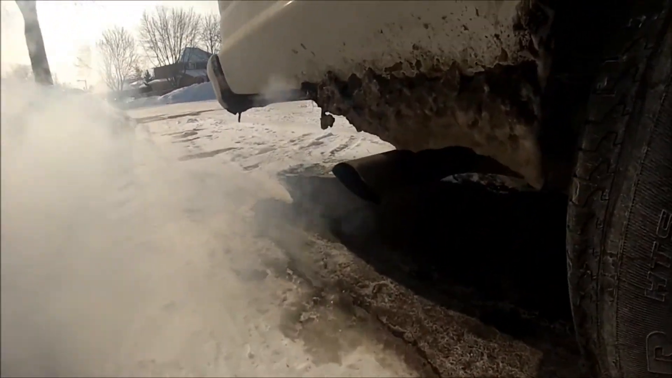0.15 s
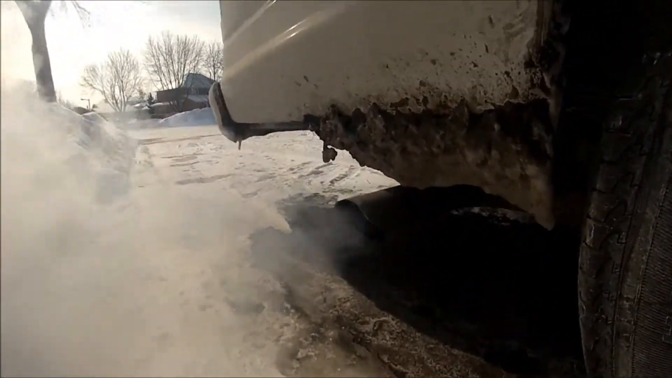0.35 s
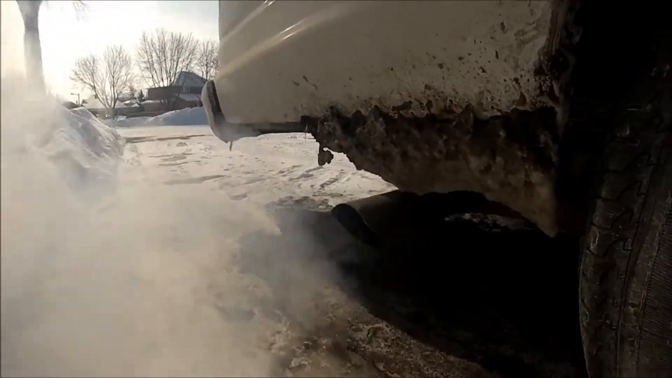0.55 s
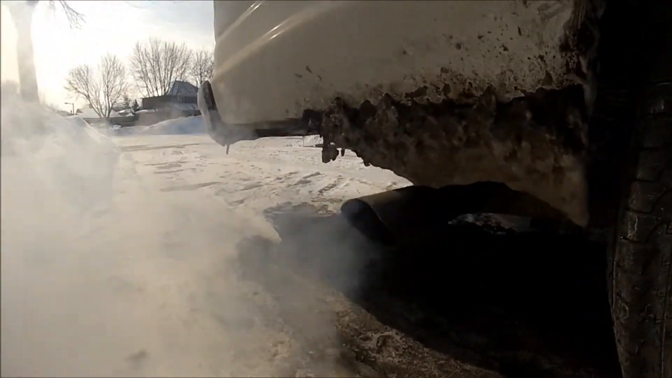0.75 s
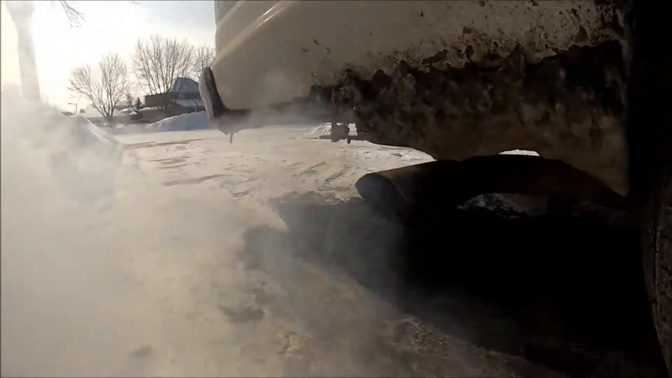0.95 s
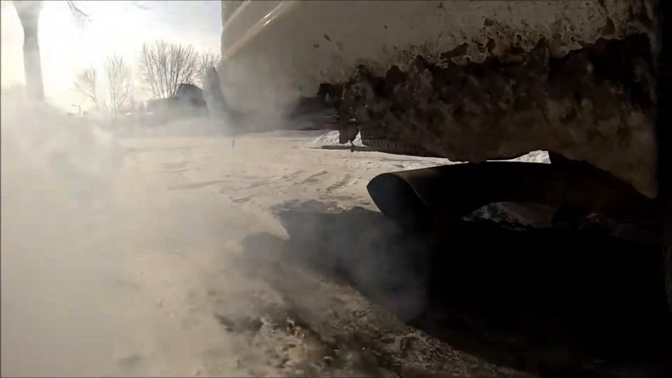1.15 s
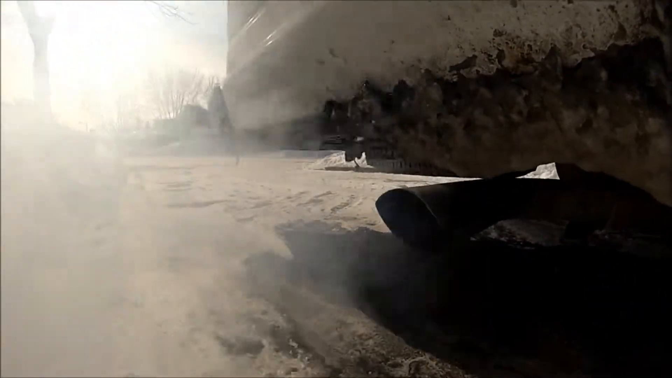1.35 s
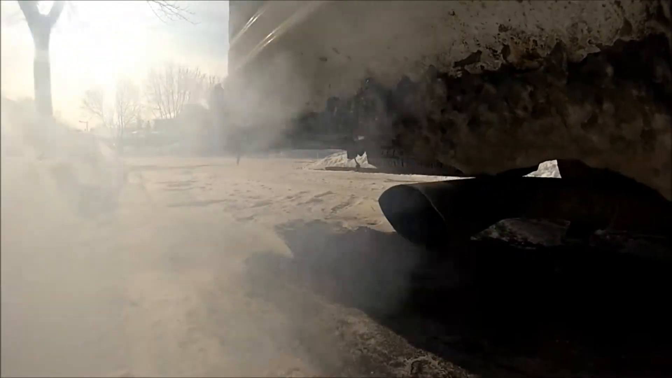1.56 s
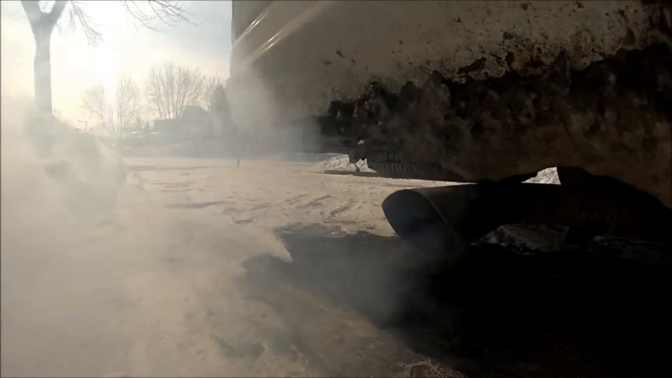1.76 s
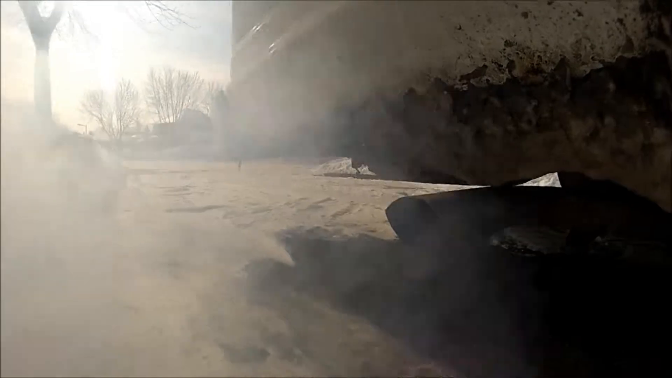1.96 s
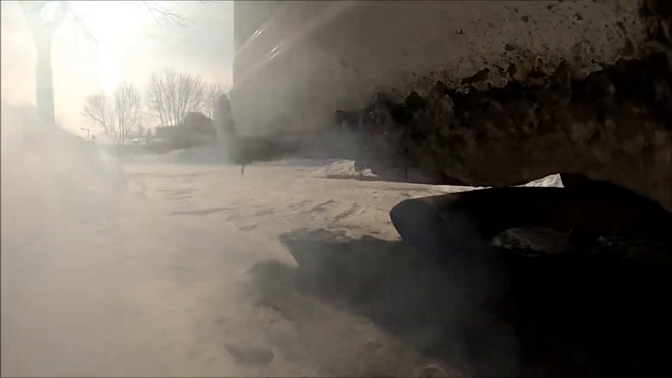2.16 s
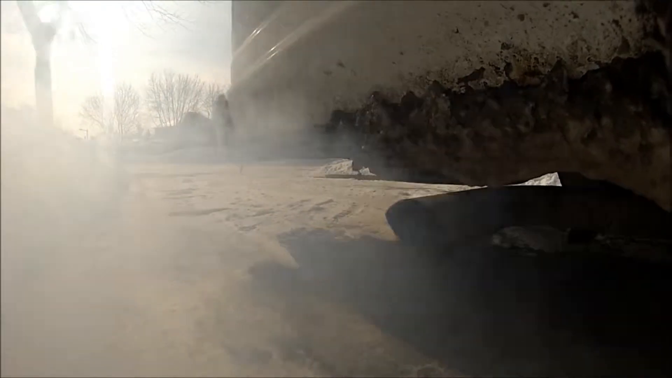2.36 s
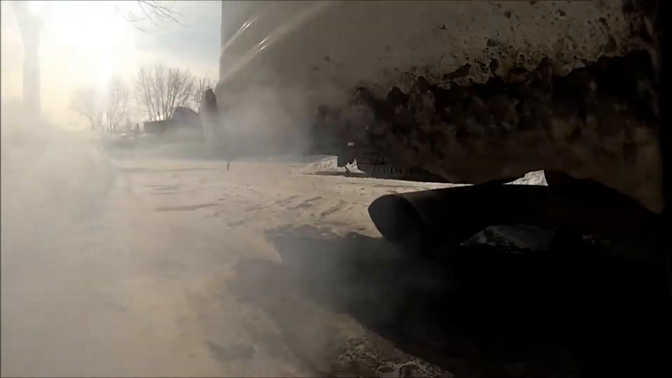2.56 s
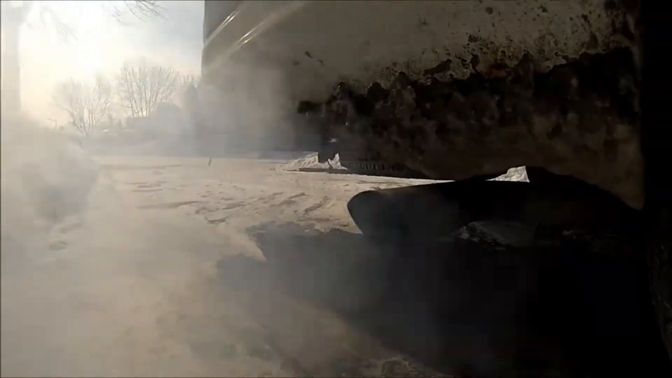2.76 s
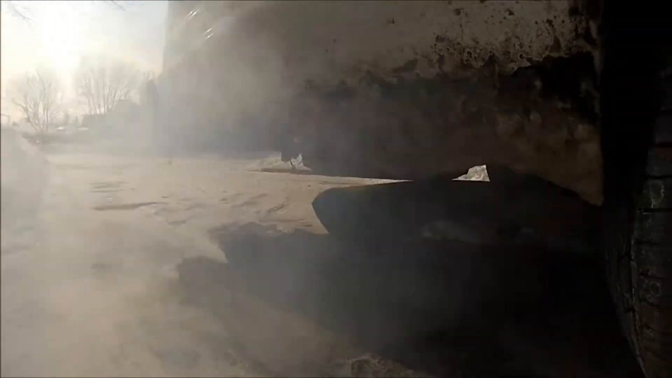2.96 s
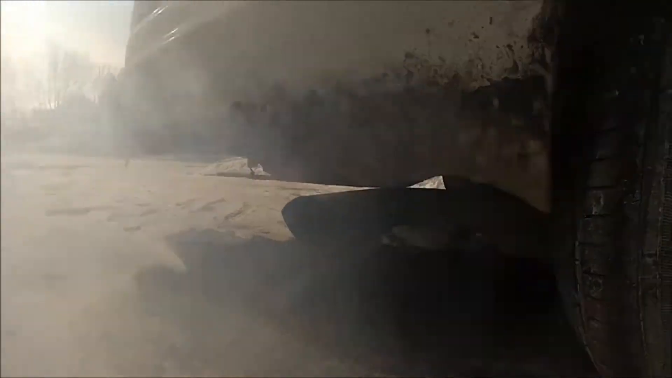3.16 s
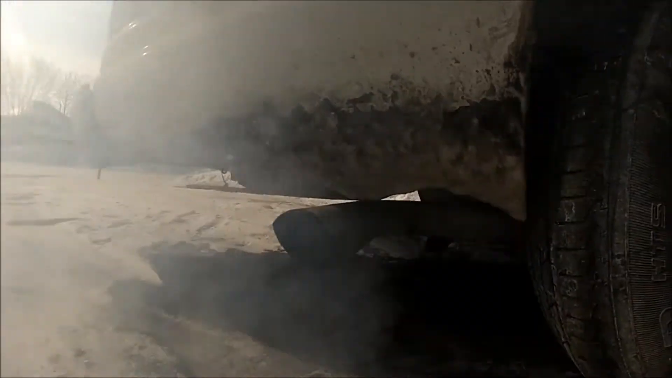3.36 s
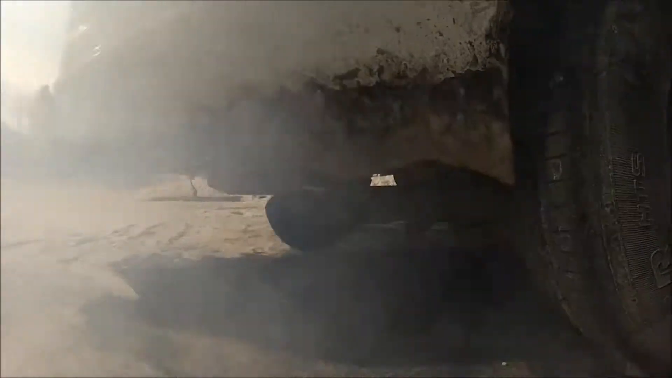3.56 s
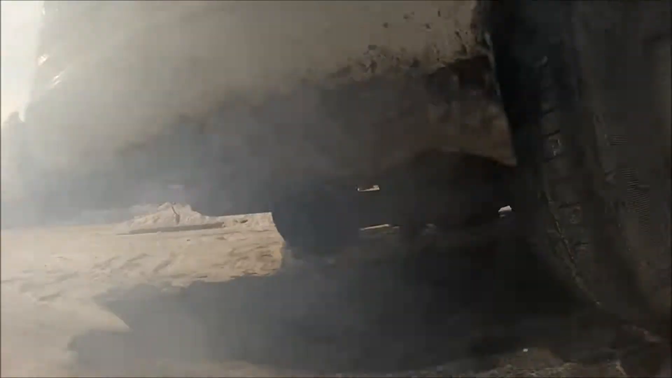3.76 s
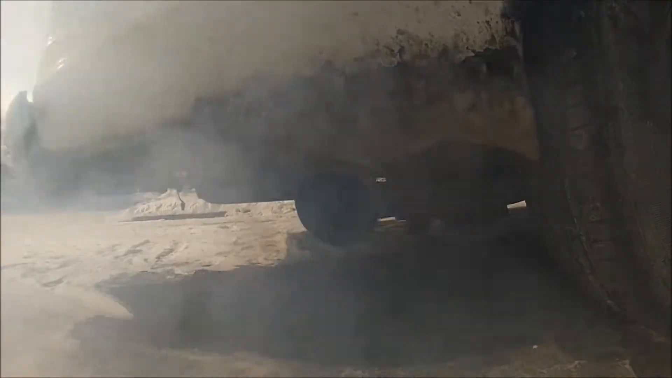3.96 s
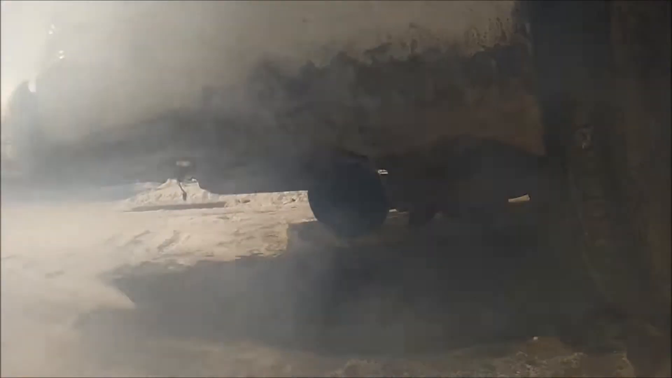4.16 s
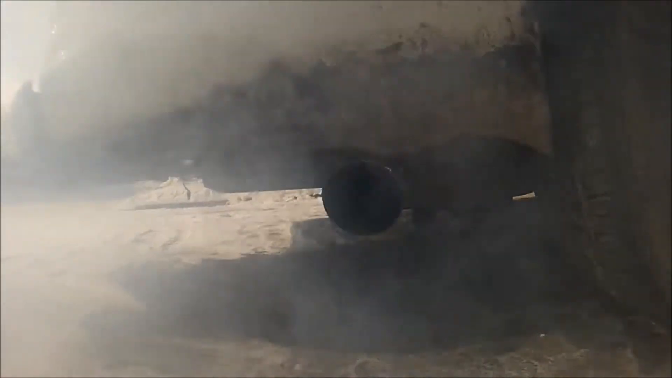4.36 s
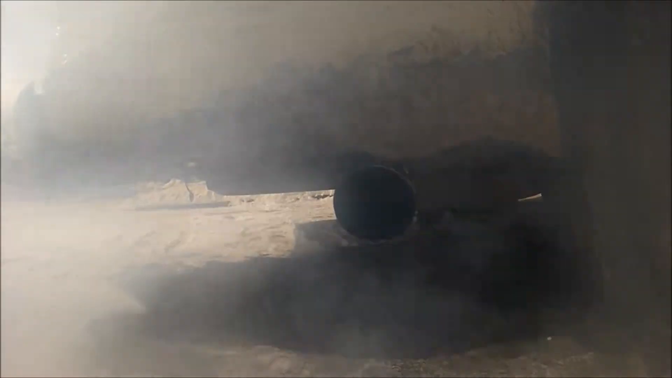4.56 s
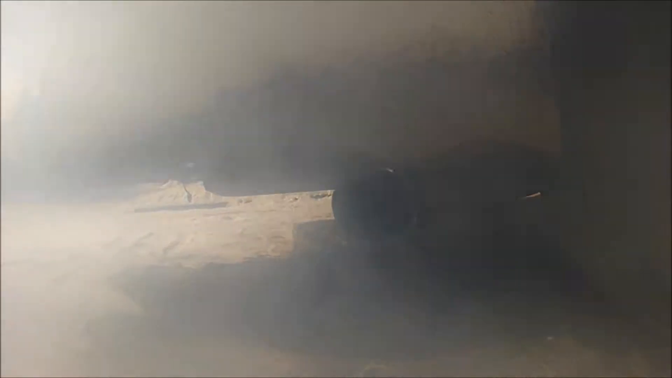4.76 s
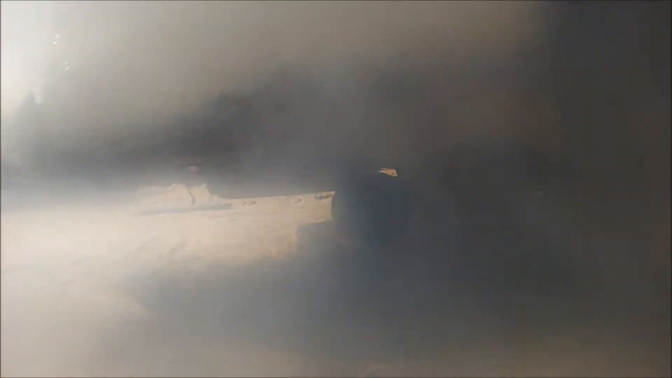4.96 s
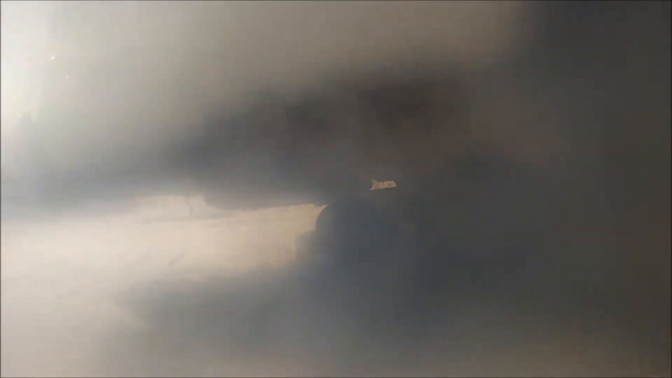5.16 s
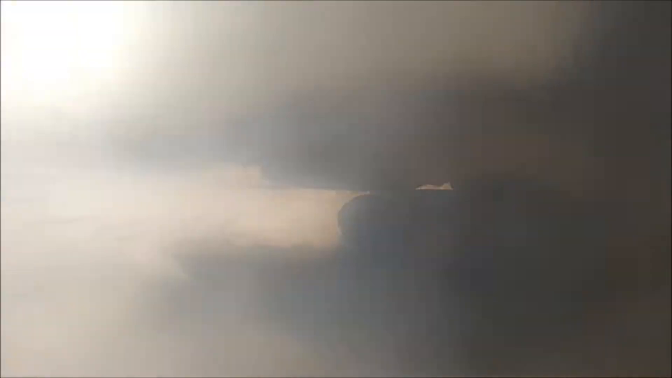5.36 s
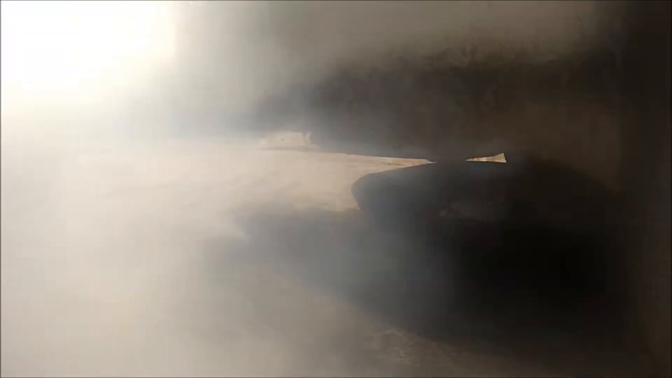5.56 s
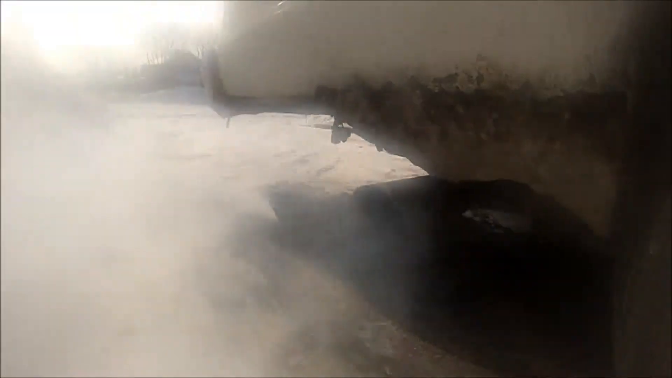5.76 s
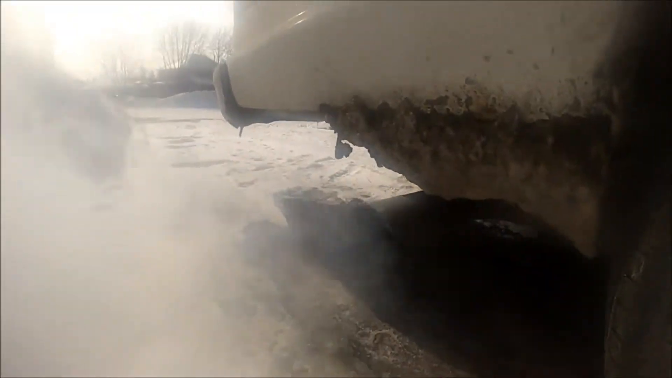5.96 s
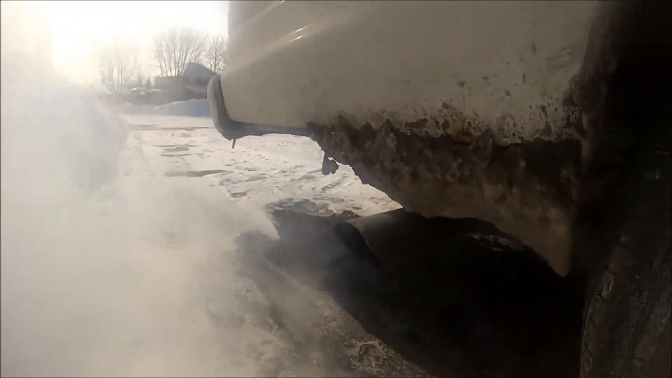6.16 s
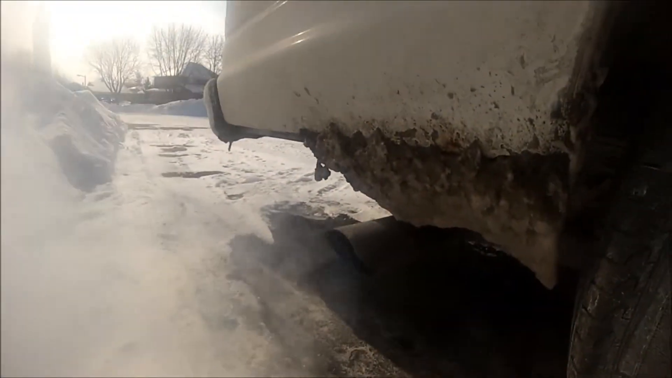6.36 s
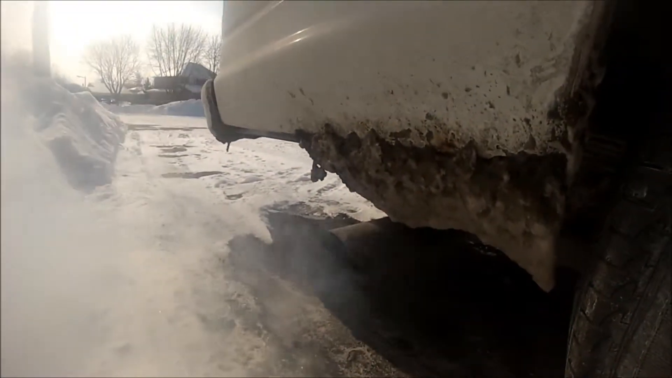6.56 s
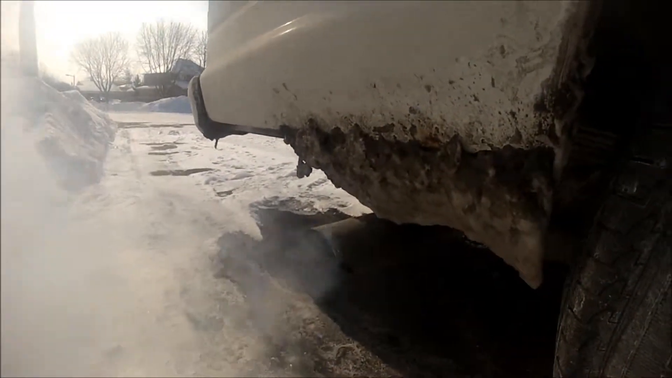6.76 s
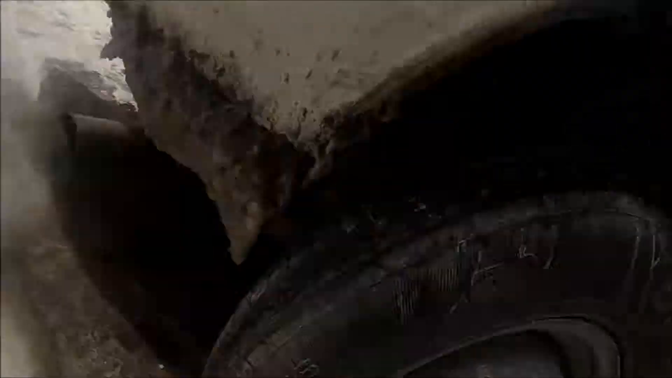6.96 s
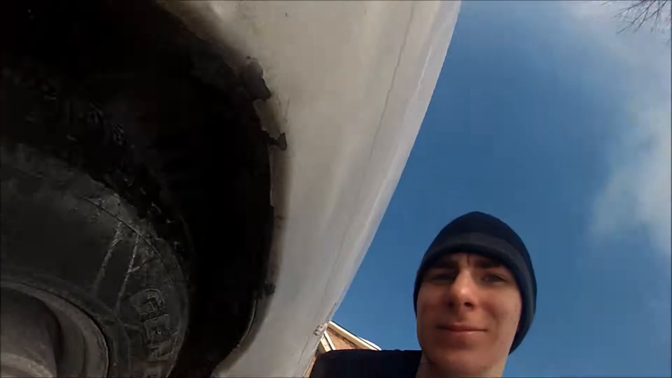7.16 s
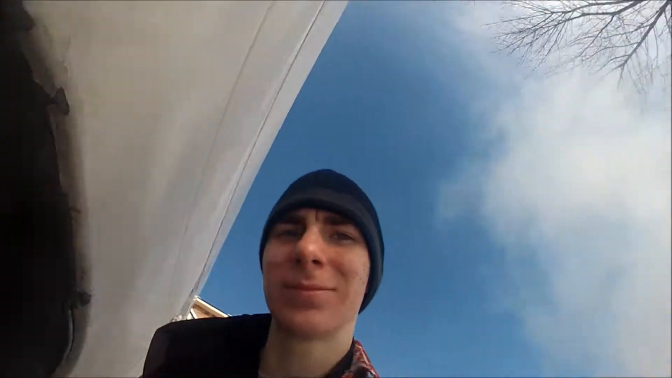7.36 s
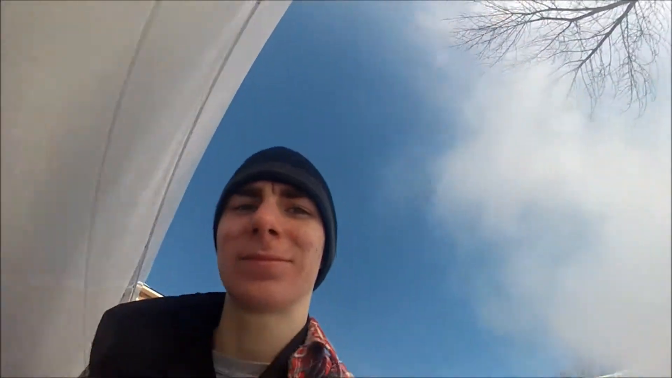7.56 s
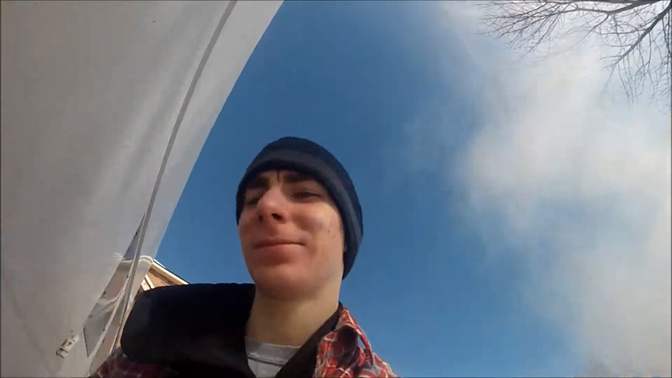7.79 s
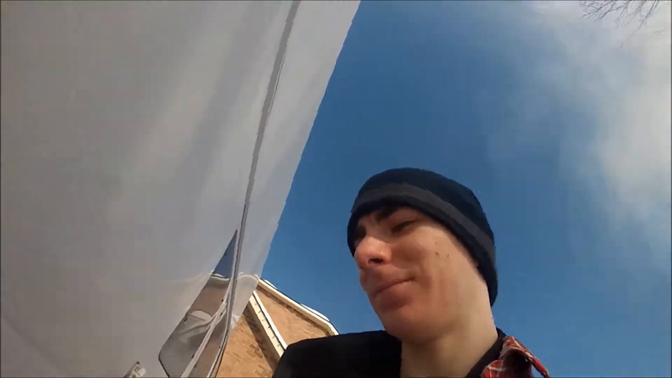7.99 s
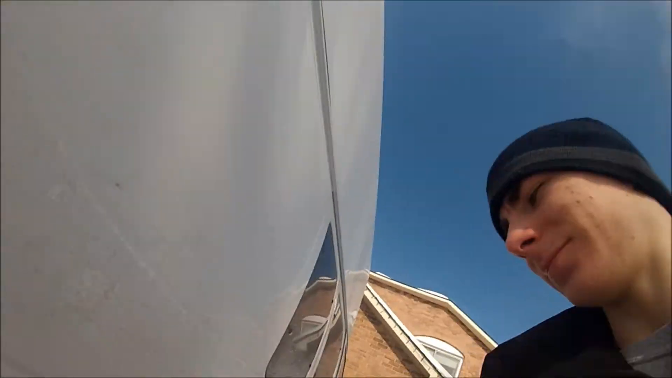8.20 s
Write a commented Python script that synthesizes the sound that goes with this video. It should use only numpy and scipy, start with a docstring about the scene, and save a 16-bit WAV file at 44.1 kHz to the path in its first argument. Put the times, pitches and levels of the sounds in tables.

```python
"""Uneven exhaust puffs and a knocking block: a large eight-cylinder diesel at a fast cold idle in a snowy yard,
heard on a hand-held microphone near the tailpipe. Clicks timed by the crank ring the pipe; noise that flares
at each knock rings the block and covers, and gas hiss pulses with the firings. For a while the microphone
sits in the jet, with low pushes and ragged flutter about once a cycle; then it is turned up and away.
Rumble, a faint gear tone, thin squeaks and dry ticks lie around the engine."""
import sys
import numpy as np
from scipy import signal
from scipy.fft import rfft, irfft, next_fast_len
from scipy.io import wavfile

SR = 44100
rng = np.random.default_rng(int(sys.argv[2]) if len(sys.argv) > 2 else 0)


def makeup_ratio(level_db):
    """Linear amplitude ratio for a level in decibels (20 dB per factor of ten)."""
    decades = np.asarray(level_db, float) / 20
    return 10 ** decades


def unload_audio(sound):
    """Save the sound as a 16-bit wav file, at the path given as the first command line argument."""
    columns = np.transpose(np.atleast_2d(sound))
    # keep every value between -1 and 1, then stretch to whole-number steps
    steps = np.round(np.clip(columns, -1, 1) * 32767)
    wavfile.write(sys.argv[1], SR, steps.astype(np.int16))


N = 362943
T = np.arange(N) / SR  # seconds
SIZE = next_fast_len(N + SR)  # transform length, with room for the ringing
HZ = np.arange(SIZE // 2 + 1) * SR / SIZE + 1e-9

# The idle hunts. Each row: time in seconds, engine speed in rpm.
SPEED_CURVE = [(0, 1097.0), (2.9, 1099.7), (3.45, 1119.3), (4.7, 1089.7), (5.7, 1112.4), (6.5, 1095.8),
               (7.1, 1108.8), (8.23, 1092.4)]

# Exhaust puffs in firing order. Each row: relative strength 0-1, lateness against even firing in ms.
EXHAUST_PUFFS = [(.68, 1.3), (.39, -.1), (.43, -.6), (.29, -.8), (.87, -.9), (.55, 2.8), (.48, -.2),
                 (.81, .7)]
# Pipe and silencer resonances. Each row: centre in Hz, width in Hz, signed relative gain.
PIPE_MODES = [(28.15, 6, -1.3), (35, 80, .26), (95.3, 6, -1.62), (131, 66, .3), (172, 34, -.62)]
PUFF_SOFT_HZ = 60  # corner above which the puffs are softened
# Exhaust note as the microphone nears and leaves the pipe. Each row: time in seconds, level in dB.
EXHAUST_LEVEL = [(0, -29), (1.2, -27), (3.4, -26), (5.1, -25.5), (6.0, -27.5), (7.45, -28), (7.9, -33),
                 (8.23, -32)]

# Gas washing past between blasts. Each row: time in seconds, mean level in dB.
DRAUGHT_LEVEL = [(3.5, -65), (3.75, -36), (4.6, -26.5), (5.4, -31), (5.7, -44), (6, -64)]
# Slugs of gas that push the microphone.
# Each row: trough time in seconds, depth in dB, width in ms, lean to the crest before (no unit).
GAS_PUSHES = [(3.744, -13, 4, 0), (3.772, -16, 4, .3), (3.852, -10, 4, 0), (3.958, -11, 4, 0),
              (3.977, -17, 3, .3), (4.064, -10, 4, .3), (4.173, -9, 3.5, .2), (4.187, -13, 3, .9),
              (4.282, -10, 3, .2), (4.297, -11, 4, 0), (4.390, -8, 3, .4), (4.499, -12, 2.6, 0),
              (4.509, -11, 3, 0), (4.519, -14, 3, 0), (4.547, -16, 5, .8), (4.611, -14, 3, .2),
              (4.626, -10, 3, .6), (4.725, -12, 5, 0), (4.754, -11, 4, -.2), (4.832, -15, 4, 0),
              (4.845, -6, 2.8, .8), (4.947, -7, 2.5, .2), (4.973, -14, 3.5, .3), (5.051, -14, 4, .2),
              (5.070, -13, 4, 0), (5.163, -14, 5, .2), (5.271, -10, 4.5, .3), (5.300, -18, 4, -.4),
              (4.080, -18, 3, 0), (4.424, -18, 3, -.3), (5.083, -18, 3, -.5), (5.378, -10, 3.5, .2),
              (5.485, -17, 3, .2)]
# Flutter as the gas tears across the ports.
# Each row: time of the top in seconds, rms level in dB, length in ms, frequency that sets its band in Hz.
GAS_FLUTTERS = [(3.761, -30.5, 14, 300), (3.853, -21, 4.4, 282), (3.954, -17.5, 8.5, 354),
                (3.972, -29, 12, 320), (4.057, -24.5, 7, 260), (4.069, -21, 6.3, 583),
                (4.175, -16.5, 6.9, 305), (4.287, -17, 14, 454), (4.387, -15.5, 6.6, 410),
                (4.402, -27, 18, 390), (4.502, -15, 7.1, 342), (4.522, -24, 9, 298), (4.612, -18, 6.7, 420),
                (4.641, -29, 11, 300), (4.724, -14, 9.2, 436), (4.745, -23, 11, 350),
                (4.831, -10, 14.5, 354), (4.936, -18.5, 10, 380), (4.951, -24, 14, 296),
                (5.046, -16.5, 15.5, 243), (5.065, -20.5, 14, 424), (5.160, -20.5, 11.5, 455),
                (5.175, -24, 15, 302), (5.27, -20, 26, 420), (5.376, -17, 4.7, 394)]
THUMP_DB, RASP_DB = -4, -6.5  # against the flutter
CRACKLE_DB, RAGGED_DB = -53, 3.0  # crackle beside a 0 dB flutter; spread of the tearing

# Thuds in the block. Each row: place in the cycle in firings, relative level in dB.
BLOCK_THUDS = [(.6, -24), (2.2, -8), (3.0, -7.5), (3.5, -9), (5.05, -5.5), (7.2, -5.5), (7.7, -12.5)]
# Block resonances under the thuds. Each row: centre in Hz, width in Hz, relative gain in dB.
BLOCK_MODES = [(675, 42, -7), (724.3, 18.3, -0.5), (779, 27, -3.5), (823.5, 20.4, 0), (851.6, 37.4, -2),
               (902.5, 25.8, -1), (989.3, 34, -6), (1145, 26, -15.5), (1220, 7.5, -13.5)]
# Engine front as the microphone moves. Each row: time in seconds, then thud, clack and hiss levels in dB.
ENGINE_LEVELS = [(0, -37.5, -41, -50), (.74, -35, -41, -49.5), (1.2, -37, -40.5, -49), (2.9, -36, -41, -49),
                 (3.4, -35.5, -41.5, -49), (4.4, -36.5, -42, -50), (5.6, -36, -41.5, -50),
                 (6.0, -37.5, -44, -51), (6.6, -37, -43.5, -52), (7.05, -35.5, -43.5, -51),
                 (7.25, -34.5, -45.5, -51), (7.65, -38, -45, -53), (8.05, -42, -45, -54),
                 (8.23, -42.5, -45.5, -55.5)]
# The singing panel. Each row: time in seconds, level in dB.
PANEL_LEVEL = [(0, -43), (.75, -45), (1.6, -50.5), (3.0, -47.5), (5.6, -51), (5.85, -45), (7.0, -43),
               (7.45, -40.5), (7.65, -43.5), (7.85, -52), (8.23, -58)]
PANEL_HZ = 518  # mean pitch

# Clacks of the valve gear. Each row: place in the cycle in firings, relative level in dB.
VALVE_CLACKS = [(.55, -5.5), (1.15, -7), (2.0, -8), (2.5, -23), (3.5, -12), (4.0, -32), (5.5, -16),
                (6.0, -9.5), (6.5, -11.5), (7.5, -18)]
# Rings added to the plain clacks. Each row: centre in Hz, width in Hz, gain over the rattle in dB.
CLACK_MODES = [(1622, 58, 0), (1750, 59, -6.5), (1876, 37, -11), (2530, 11, 2.5), (2690, 16, -5),
               (3320, 170, -5.5)]
# Strength of the gas hiss at each firing, in firing order: relative level in dB.
FIRING_HISS = [5.5, 7.5, 5.5, 6.5, 8, 3.5, 6, 1.5]
# Microphone pose. Each row: time in seconds, pose number (0 beside, 1 facing, 2 turning, 3 turned up).
MIC_POSE = [(0, 0), (2.9, 0), (3.5, 1), (5.6, 1), (6.1, .6), (7.0, .6), (7.25, 2), (7.5, 2), (7.75, 3),
            (8.23, 3)]
# Colour of clack and hiss beside the pipe. Each row: frequency in Hz, relative gain in dB.
BESIDE_PIPE = [(740, 0.5), (1250, 1.5), (1320, -4.5), (1840, -1), (2150, -1.5), (2620, -2), (2900, -4.5),
               (3760, -12.5), (6880, -28), (8920, -30), (10400, -38), (11800, -32), (15000, -54)]
# Colour facing the pipe. Each row: frequency in Hz, relative gain in dB.
FACING_PIPE = [(740, -14), (1250, -4), (1390, -10), (1670, -3.5), (2000, -5), (2620, -8.5), (3720, -20),
               (4780, -20.5), (5950, -31.5), (7960, -39), (8650, -38), (11800, -43), (15000, -56)]
# Colour swinging past the wheel. Each row: frequency in Hz, relative gain in dB.
PAST_WHEEL = [(740, -56), (1250, -3), (1820, -7), (2210, -14.5), (2810, -13.5), (3390, -13.5), (4260, -23),
              (5950, -25.5), (8650, -41), (15000, -50)]
# Colour with the microphone pointing up. Each row: frequency in Hz, relative gain in dB.
POINTING_UP = [(740, -6), (1250, 0), (1730, -5.5), (2380, -7.5), (2750, -8.5), (3500, -12.5), (4220, -22),
               (5410, -14), (7960, -38), (15000, -42)]

# Thin covers rung by the valve gear.
# Each row: centre in Hz, width in Hz, blows as (place in the cycle in firings, relative level in dB).
THIN_COVERS = [(1700, 54, [(1.2, -6), (1.8, -2), (3.4, -5), (5.6, -14), (6.25, -7)]), (1880, 76, [(1.0, -9),
               (1.6, -10), (5.9, -6.5)]), (2580, 220, [(1.0, -5), (2.0, -0.5), (5.9, -0.5)])]
# Covers come and go as the microphone moves. Each row: time in seconds, then the level of each cover in dB.
COVER_LEVELS = [(0, -59, -45, -58), (.35, -56, -47, -62), (.5, -54, -46, -50), (.68, -48, -43, -46),
                (.8, -44.5, -51, -52), (1.1, -53, -51.5, -74), (2.9, -65, -52, -63), (3.4, -49, -46, -49),
                (3.799, -58, -48, -63), (4.4, -62, -56, -60), (5.1, -46, -54, -56), (5.6, -57, -66, -70),
                (6.1, -50, -70, -54), (6.6, -52, -62, -55), (6.95, -56, -62, -52), (7.1, -61, -76, -59),
                (7.5, -63, -66, -66)]

# Low resonances of the underbody.
# Each row: centre in Hz, width in Hz, rms level in dB while the exhaust note is at its median level.
UNDERBODY_MODES = [(103, 34, -46.5), (165.4, 55, -41), (322.5, 48.5, -45), (339.3, 14.6, -46),
                   (396.6, 28, -51), (451, 45, -47), (552, 116, -44)]
# Brief squeaks. Each row: start in seconds, length in ms, start pitch in Hz, end pitch in Hz, level in dB.
SQUEAK_LIST = [(7.188, 30, 3350, 3260, -46), (7.30, 30, 3400, 3360, -52), (7.325, 45, 3220, 3420, -49),
               (7.40, 32, 3300, 3400, -48), (7.533, 30, 3480, 3500, -47), (7.565, 50, 3490, 3480, -53)]
# Lone ticks, by band. Each row: start in seconds, peak level in dB, low edge in Hz, high edge in Hz.
TICK_LIST = [(1.063, -36, 2200, 9000), (1.365, -40, 5000, 12000), (5.1985, -28, 2800, 7200),
             (5.1985, -41, 9500, 13000), (8.0875, -32, 2000, 3100), (8.0875, -37, 4100, 4900),
             (8.0875, -42, 5300, 6600)]

LIMIT_DB, RELEASE_DB_S, TOP = -5.5, 80, .9  # limiter threshold, fall of the held excess, rounding ceiling


def rms_one(x):
    """Scaled to rms 1."""
    return x / np.sqrt(np.mean(x ** 2) + 1e-20)


def in_time(rows):
    """Curve columns, one value a sample."""
    s, *columns = np.transpose(rows)
    return [np.interp(T, s, column) for column in columns]


def through(x, response):
    """Filtered by a frequency response."""
    return irfft(rfft(x, SIZE) * response, SIZE)[:N]


def peak(hz, width_hz):
    """One resonance, gain 1 on top."""
    return 1j * HZ * width_hz / (hz ** 2 - HZ ** 2 + 1j * HZ * width_hz)


def band(x, low_hz, high_hz):
    """Band-pass."""
    return signal.sosfilt(signal.butter(2, [low_hz, high_hz], "band", fs=SR, output="sos"), x)


def drift(rate_hz):
    """Chance wander with rms 1, smoothed above rate_hz."""
    return rms_one(through(rng.standard_normal(N), 1 / (1 + 1j * HZ / rate_hz) ** 2))


def crank():
    """Engine cycles completed: one cycle is two turns."""
    return np.cumsum(in_time(SPEED_CURVE)[0]) / (120 * SR)


def each_cycle(firings, sizes, scatter_db, lag_s=0):
    """A click for every place in every cycle, its size scattered a little each time."""
    done = crank()
    places = np.arange(int(done[-1]) + 1)[:, None] + np.array(firings) / 8
    seconds = np.interp(places, done, T, right=2 * T[-1]) + lag_s
    at = np.round(seconds * SR).astype(int).ravel()
    size = (sizes * makeup_ratio(scatter_db * rng.standard_normal(places.shape))).ravel()
    inside = (at >= 0) & (at < N)
    return np.bincount(at[inside], size[inside], minlength=N)


def knocking(knocks, decay_ms, steady, scatter_db):
    """Noise that flares at each knock and dies exponentially, over a steady rattle."""
    places, level_db = np.transpose(knocks)
    clicks = each_cycle(places, makeup_ratio(level_db), scatter_db)
    flare = signal.lfilter([1], [1, -np.exp(-1000 / (decay_ms * SR))], clicks)
    return (steady + flare) * rng.standard_normal(N)


def exhaust(level_db):
    """Eight soft puffs a cycle, uneven in size and timing, ring the pipe."""
    strength, late_ms = np.transpose(EXHAUST_PUFFS)
    puffs = each_cycle(np.arange(8), strength, scatter_db=.3, lag_s=late_ms / 1000)
    modes = sum(gain * peak(hz, width) for hz, width, gain in PIPE_MODES)
    softening = 1 / (1 + 1j * HZ / PUFF_SOFT_HZ) ** 2
    return makeup_ratio(level_db) * rms_one(through(puffs, modes * softening))


def draught():
    """Low noise of gas washing past between blasts."""
    level_db = in_time(DRAUGHT_LEVEL)[0] + 3 * drift(20)
    return makeup_ratio(level_db) * rms_one(band(rng.standard_normal(N), 60, 200))


def swing(u, lean):
    """A trough, -1 at u = 0, between two crests; positive lean raises the first crest."""
    return (u ** 2 - 1 - 1.3 * lean * u) * np.exp(-u ** 2 / 2)


def pushes():
    """Slugs of gas push the microphone: round low pressure swings."""
    return sum(makeup_ratio(db) * swing(1000 * (T - s) / ms, lean) for s, db, ms, lean in GAS_PUSHES)


def flutters():
    """Gas tearing across the ports: ragged noise bursts with thump, rasp and crackle."""
    out = np.zeros(N)
    noise = rng.standard_normal(N)
    ragged = makeup_ratio(RAGGED_DB * drift(90.0))
    thump = band(rng.standard_normal(N), 75, 140)
    rasp = ragged * band(band(noise, 580, 950), 450, 1050)
    crackle = band(noise * makeup_ratio(2.5 * drift(200.0)), 4500, 13000)  # spits of gas on the grille
    half = SR // 20
    age_ms = 1000 * T[:SR // 10] - 50  # from the top of the gust
    tail = 0.22 * (age_ms > 0) * np.exp(-age_ms / 22.0) * (1 - age_ms / 50)
    for s, db, ms, hz in GAS_FLUTTERS:
        span = slice(round(s * SR) - half, round(s * SR) + half)
        side_ms = np.where(age_ms < 0, .4 * ms, .85 * ms)  # rises faster than it falls
        gust = np.exp(-(age_ms / side_ms) ** 2) + tail
        flutter = band(band(noise[span], hz / 2.4, hz * 1.35), hz / 3, hz * 2) * ragged[span]
        layers = ((flutter, db), (thump[span], db + THUMP_DB), (rasp[span], db + RASP_DB),
                  (crackle[span], CRACKLE_DB + db / 2))  # crackle grows half as fast in dB
        for layer, layer_db in layers:
            part = layer * gust
            out[span] += makeup_ratio(layer_db) * part * np.sqrt(np.mean(gust ** 2) / np.mean(part ** 2))
    return out


def jet():
    """Turbulent gas on the microphone: draught, pushes and flutter together."""
    return draught() + pushes() + flutters()


def block(thud_db):
    """Thuds, short flares of noise, ring the modes of the block."""
    thuds = knocking(BLOCK_THUDS, decay_ms=2.8, steady=.15, scatter_db=2.0)
    modes = sum(makeup_ratio(db) * peak(hz, width) * (-1) ** k  # neighbours in opposite sign
                for k, (hz, width, db) in enumerate(BLOCK_MODES))
    return makeup_ratio(thud_db) * rms_one(through(thuds, modes))


def panel(panel_db, cycles):
    """One panel of the block sings a thin note that sags in pitch and dips in level once a cycle."""
    hz = PANEL_HZ + 9 * np.cos(2 * np.pi * (cycles - .56)) + 2.5 * drift(6)
    note = np.sin(2 * np.pi * np.cumsum(hz) / SR)
    throb_db = 2.6 * np.cos(2 * np.pi * (cycles - .52)) + 1.0 * drift(12)
    return makeup_ratio(panel_db) * rms_one(note * makeup_ratio(throb_db))


def coloured(x, split):
    """The colour passes from one pose of the microphone to the next, each at rms 1."""
    pose, out = in_time(MIC_POSE)[0], 0
    for k, table in enumerate((BESIDE_PIPE, FACING_PIPE, PAST_WHEEL, POINTING_UP)):
        hz, db = np.transpose(table)
        colour = makeup_ratio(np.interp(np.log(HZ), np.log(hz), db))
        share = np.clip(1 - np.abs(pose - k), 0, 1)
        out = out + share * rms_one(through(x, split * colour))
    return out


def clack_and_hiss(cycles, clack_db, hiss_db):
    """Ringing valve clacks below the split; gas hiss pulsing with the flow, and some clack, above it."""
    upper = 1 / (1 + (3700 / HZ) ** 8)  # share of power above 3700 Hz
    clacks = knocking(VALVE_CLACKS, decay_ms=4.5, steady=0.6, scatter_db=2.8)
    rings = 1 + sum(makeup_ratio(db) * peak(hz, width) for hz, width, db in CLACK_MODES)
    flow_db = np.interp(8 * cycles, np.arange(8), FIRING_HISS, period=8)
    gas = makeup_ratio(flow_db + 1.5 * drift(38.0)) * rng.standard_normal(N)
    hiss = gas + 0.23 * rms_one(clacks)
    low = makeup_ratio(clack_db) * coloured(clacks, rings * np.sqrt(1 - upper))
    high = makeup_ratio(hiss_db) * coloured(hiss, np.sqrt(upper))
    return low + high


def covers():
    """Short blows of the valve gear set each thin cover ringing on its own note."""
    out = 0
    for (hz, width, blows), db in zip(THIN_COVERS, in_time(COVER_LEVELS)):
        struck = knocking(blows, decay_ms=4.0, steady=.2, scatter_db=2.5)
        out = out + makeup_ratio(db) * rms_one(through(struck, peak(hz, width) * peak(hz, 4 * width)))
    return out


def underbody(exhaust_db):
    """Unevenly shaken low resonances rumble, rising and falling 0.37 dB for each dB of the exhaust note."""
    shake = rng.standard_normal(N) * makeup_ratio(2.0 * drift(47.0))
    rumble = sum(makeup_ratio(db) * rms_one(through(shake, peak(hz, width))) * (-1) ** k
                 for k, (hz, width, db) in enumerate(UNDERBODY_MODES))
    return makeup_ratio(0.37 * (exhaust_db - np.median(exhaust_db))) * rumble


def gears(cycles, exhaust_db):
    """A faint tone locked to the crank, 28 waves a cycle, flickering in level."""
    flicker_db = 3 * drift(8)
    return makeup_ratio(exhaust_db - 25 + flicker_db) * np.sin(2 * np.pi * 28 * cycles)


def squeaks():
    """Thin short whistles, sines that glide and waver in pitch."""
    waver_hz, fray_db, out = 35 * drift(60.0), 3 * drift(80.0), 0
    for s, ms, start_hz, end_hz, db in SQUEAK_LIST:
        done = np.clip(1000 * (T - s) / ms, 0, 1)
        hz = start_hz + (end_hz - start_hz) * done + waver_hz
        tone = np.sin(2 * np.pi * np.cumsum(hz) / SR)
        out = out + makeup_ratio(db + fray_db) * np.sin(np.pi * done) * tone
    return out


def ticks():
    """Short dry ticks close to the microphone: band-passed noise dying within milliseconds."""
    out = np.zeros(N)
    for s, db, low_hz, high_hz in TICK_LIST:
        i, age = round(s * SR), T[:300]
        burst = rng.standard_normal(len(age)) * age * np.exp(-age / .0007)
        burst = band(band(burst, low_hz, high_hz), .8 * low_hz, 1.15 * high_hz)
        out[i:i + len(age)] += makeup_ratio(db) * burst / np.abs(burst).max()
    return out


def scene():
    """Engine, jet on the microphone and small sounds close by."""
    cycles, exhaust_db, panel_db = crank(), in_time(EXHAUST_LEVEL)[0], in_time(PANEL_LEVEL)[0]
    thud_db, clack_db, hiss_db = in_time(ENGINE_LEVELS)
    engine = exhaust(exhaust_db) + block(thud_db) + panel(panel_db, cycles)
    engine += clack_and_hiss(cycles, clack_db, hiss_db) + covers()
    engine += underbody(exhaust_db) + gears(cycles, exhaust_db)
    return (engine + jet() + squeaks() + ticks())[None]


def limiter_gain(x):
    """Ducks 1.2 dB for each dB over the threshold, smoothed over 4 ms, and lets go steadily."""
    over_db = np.maximum(20 * np.log10(np.abs(x) + 1e-9) - LIMIT_DB, 0)
    held_db = np.maximum.accumulate(over_db + RELEASE_DB_S * T) - RELEASE_DB_S * T
    r = np.exp(-1 / (.004 * SR))
    return makeup_ratio(-1.2 * signal.lfilter([1 - r], [1, -r], held_db))


def band_limit(x):
    """A steep low-pass at the top of the band."""
    return signal.sosfilt(signal.butter(12, 15330, fs=SR, output="sos"), x)


def record(dry):
    """The limiter ducks after the hardest blasts; peaks are rounded and the top is cut."""
    limited = dry * limiter_gain(dry[0])
    rounded = TOP * np.tanh(limited / TOP)
    heard = signal.sosfilt(signal.cheby2(10, 50, 15400, fs=SR, output="sos"), rounded)
    return band_limit(heard)


dry = scene()
out = record(dry)
unload_audio(out)
```